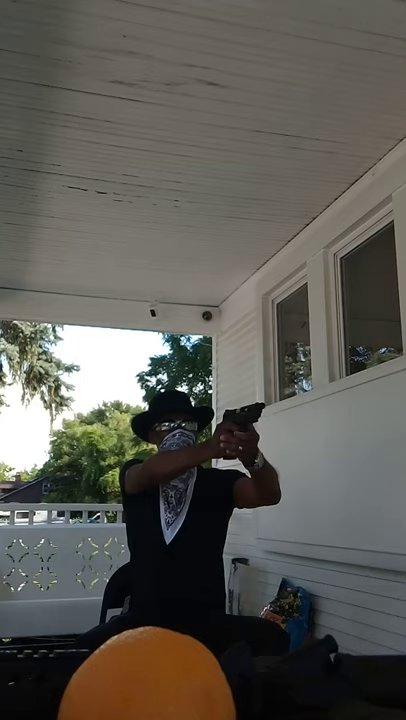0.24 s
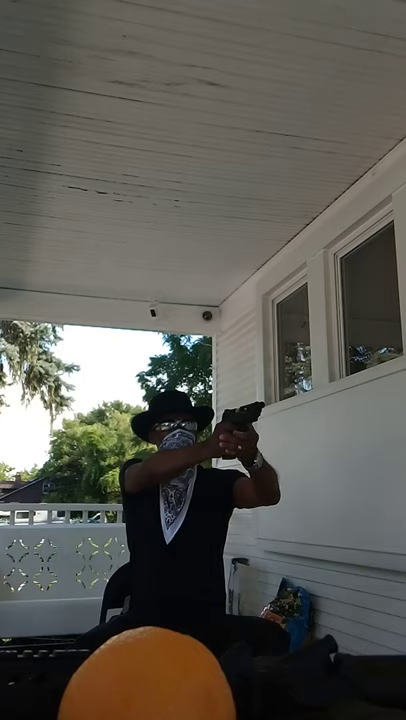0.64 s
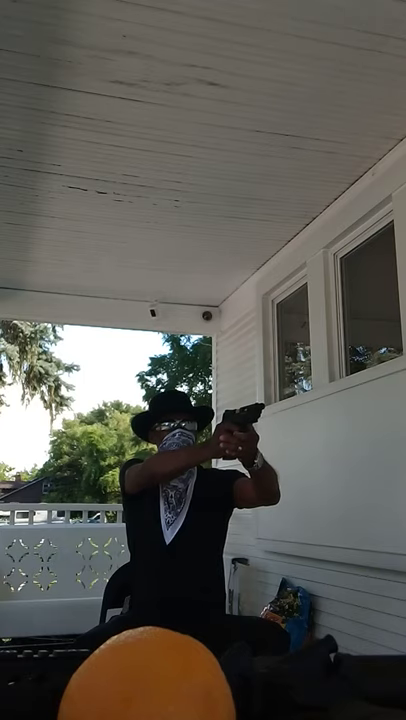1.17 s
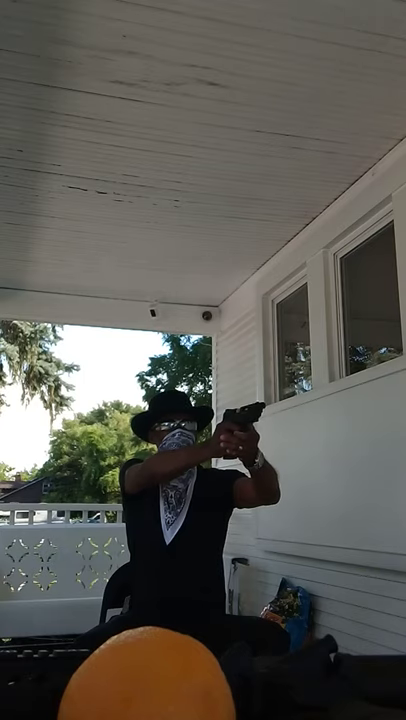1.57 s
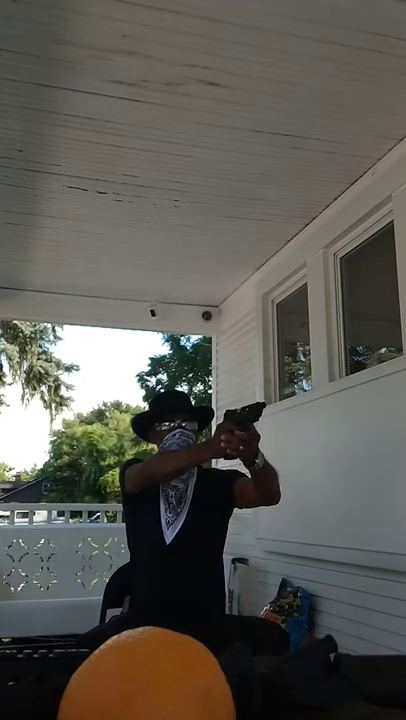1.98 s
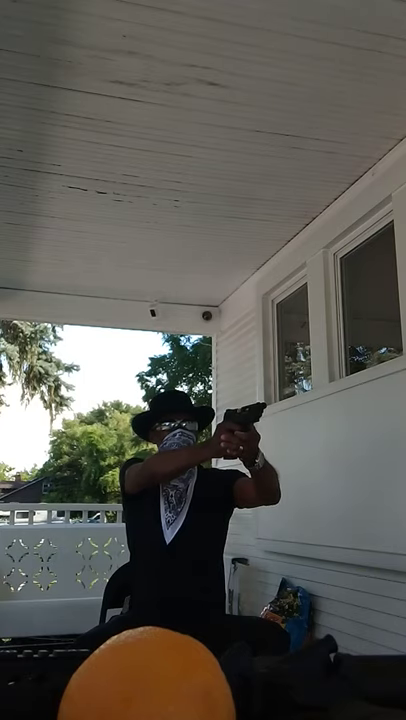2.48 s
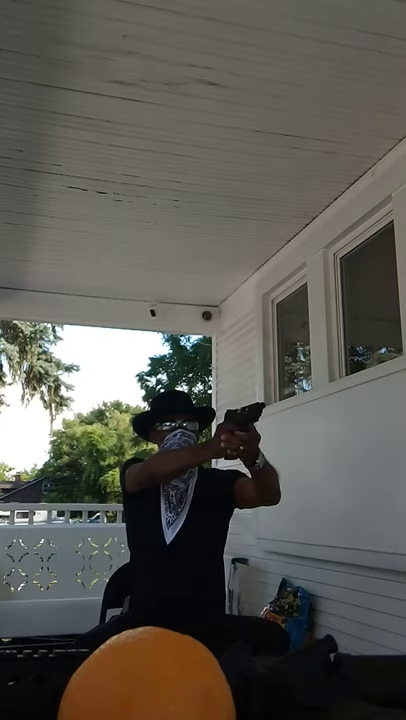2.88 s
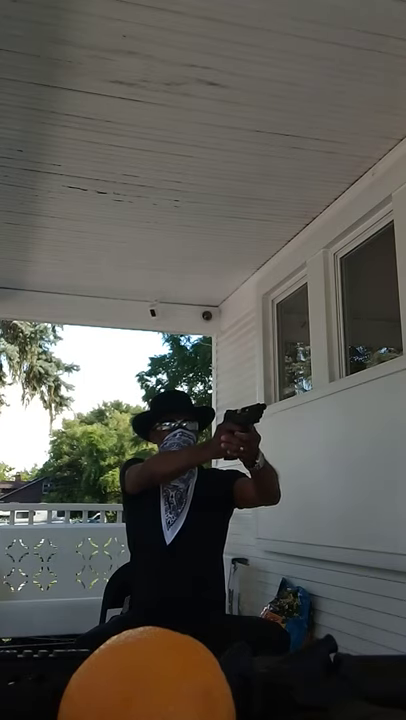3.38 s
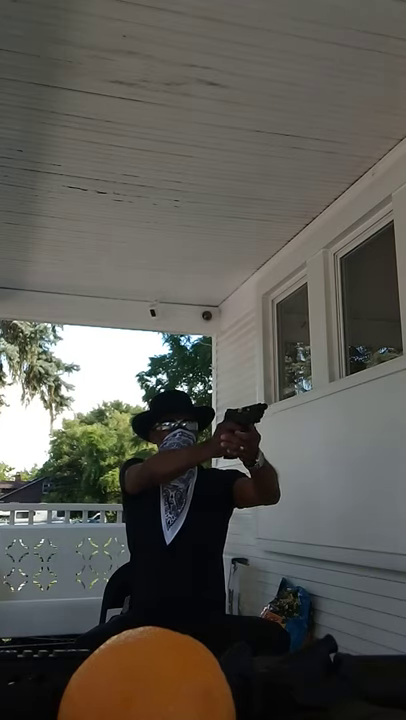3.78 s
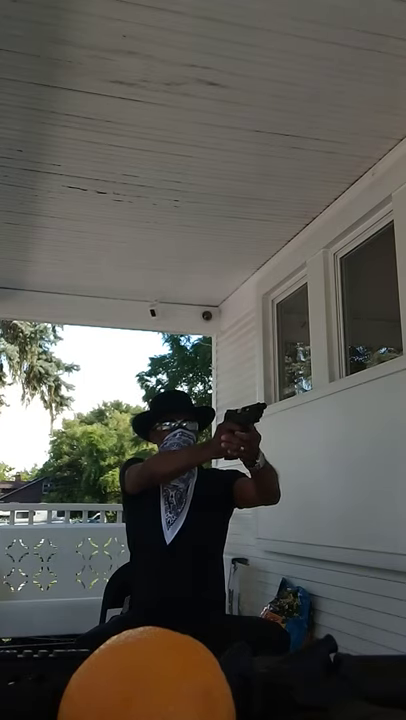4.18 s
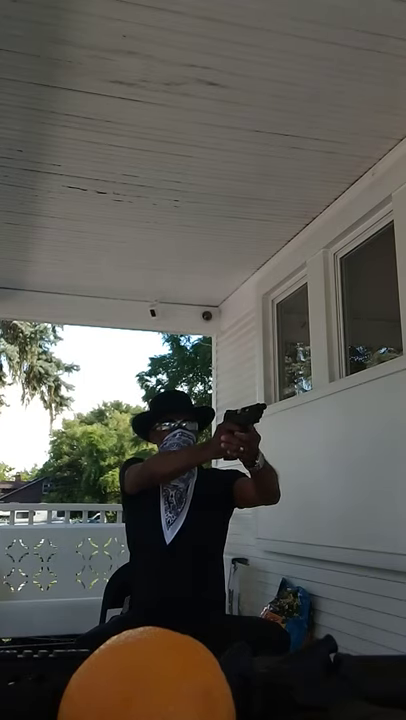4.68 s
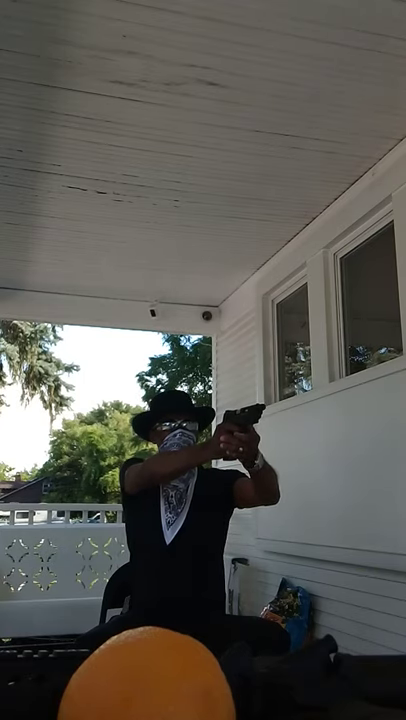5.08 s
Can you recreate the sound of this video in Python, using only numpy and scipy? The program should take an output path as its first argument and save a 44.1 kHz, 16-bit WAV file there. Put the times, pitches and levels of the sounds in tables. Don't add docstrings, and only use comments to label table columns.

```python
import sys
import numpy as np
from scipy import signal
from scipy.io import wavfile
from scipy.ndimage import uniform_filter1d, minimum_filter1d

SR = 44100
rng = np.random.default_rng(int(sys.argv[2]) if len(sys.argv) > 2 else 0)


def invert_db(level):
    return 10 ** (np.asarray(level, dtype=float) / 20)


def generate_wav(signal):
    frames = np.transpose(np.atleast_2d(signal))
    scaled = np.clip(frames, -1, 1) * 32767
    pcm = np.round(scaled).astype(np.int16)
    wavfile.write(sys.argv[1], SR, pcm)


N = 235449


def evened(x):
    return x / np.sqrt(np.mean(x ** 2) + 1e-20)


def smoothed(x, along_hz, along_time):
    return uniform_filter1d(uniform_filter1d(x, size=along_hz, axis=0), size=along_time, axis=1)


def read(points, hz):
    f, value = np.transpose(points)
    return np.interp(np.log(hz + 1), np.log(f + 1), value)


def add(mix, s, sound):
    part = mix[round(s * SR):][:len(sound)]
    part += sound[:len(part)]


def colour(points, tilt_db=0):
    hz = abs(np.fft.fftfreq(4096, 1 / SR))
    level_db = read(points, hz) + tilt_db * np.log2((hz + 200) / 2000)
    log_gain = np.log(invert_db(np.maximum(level_db, -90)))
    taps = np.fft.ifft(np.exp(np.conj(signal.hilbert(log_gain)))).real[:2048]
    return taps / np.linalg.norm(taps)


def puff(hold_s, t60, rough_db):
    t = np.arange(2000) / SR
    flicker = evened(uniform_filter1d(rng.standard_normal(len(t)), size=40))
    fall_db = 60 * np.maximum(t - hold_s, 0) / max(t60, 1e-3)
    return rng.standard_normal(len(t)) * invert_db(rough_db * flicker - fall_db)


# frequency in Hz, t60 in seconds.
PORCH_DECAY = [(100, .06), (400, 0.16), (700, 0.22), (950, 0.29), (1800, 0.26), (6000, 0.28), (12000, 0.2),
               (16000, 0.19)]
# frequency in Hz, t60 in seconds.
YARD_DECAY = [(300, 1.16), (700, 0.72), (1000, 1.234), (3000, 1.12), (7000, 0.74), (12000, 0.39)]
LATE_FALL_S, LATE_FALL_DB_PER_S = 0.57, -61


def space(tick, porch_db, yard_db, rise_s):
    hz, t, z = signal.stft(rng.standard_normal(SR), SR, nperseg=256)
    porch = invert_db(porch_db - 60 * t / read(PORCH_DECAY, hz)[:, None])
    yard = invert_db(yard_db - 60 * t / read(YARD_DECAY, hz)[:, None]) * np.clip(t / 0.081, 0, 1)
    yard = yard * invert_db(LATE_FALL_DB_PER_S * np.maximum(t - LATE_FALL_S, 0))
    patches = evened(smoothed(rng.standard_normal(z.shape), 4, 8))
    clusters = invert_db(1.65 * patches + 1.7 * rng.standard_normal(len(t)))
    echo = signal.istft(z * np.hypot(porch, yard) * clusters, SR, nperseg=256)[1]
    echo *= np.clip(np.arange(len(echo)) / SR / rise_s, 0, 1)
    return signal.fftconvolve(echo, tick)


# start in seconds, peak in dB, gas push relative to it in dB.
SHOTS = [(0.541, -6.5, -1), (1.8163, -8.5, 1), (2.5590, -8.5, -1.5), (2.7599, -9, 0.5), (3.6297, -10, 3),
         (3.8553, -9, 3), (4.7473, -10, 3)]
# frequency in Hz, density in dB per Hz.
BLAST = [(180, -21), (400, -12), (1000, -2.5), (2000, -3), (4000, -3.5), (7000, -1), (11000, -8.5),
         (16000, -17)]
# frequency in Hz, density in dB per Hz.
PUSH = [(25, -24.5), (60, -6), (120, 5.5), (250, 6), (500, -2), (1200, -3.5), (2500, -7.5), (5000, -17.5)]
FRONT_DB, FRONT_TILT_DB = 1, 3


def shots():
    mix = np.zeros(N)
    front, crack, push = colour(BLAST, FRONT_TILT_DB), colour(BLAST), colour(PUSH)
    for s, db, low_db in SHOTS:
        add(mix, s, invert_db(db + FRONT_DB) * np.convolve(puff(0.0012, 0.005, 1.0), front))
        add(mix, s, invert_db(db) * space(crack, 6.35, -19.5, 0.00117))
        gas = puff(0.014, 0.022, 2)
        add(mix, s, invert_db(db + low_db) * np.convolve(gas, push))
    return mix


# start in seconds, peak in dB, brightness in dB per octave.
STRIKES = [(0.5803, -15, 0.5), (1.8565, -17, 5), (2.6, -17, -2), (2.8038, -18.5, -3.5), (3.6727, -17, 2),
           (3.9000, -17.5, 2.5), (4.7917, -19.5, 4)]
# frequency in Hz, density in dB per Hz.
TIN = [(300, -44.5), (500, -9), (760, -31.5), (850, -6.5), (1250, -2), (1700, -2.5), (2200, -12),
       (5000, -16), (10000, -22), (16000, -48)]
# frequency in Hz, level in dB, t60 in seconds.
PANEL = [(432, -16, 0.58), (520, -8, 0.34), (544, -2.5, 0.28), (708, -18.5, 0.29), (752, -6.5, 0.31),
         (836, 3, 0.26), (938, 2.5, 0.45), (1046, -4.5, 0.28), (1122, 8.5, 0.29), (1275, 1.5, 0.37),
         (1470, -2, 0.33), (1420, -23, 0.16), (1644, 3.5, 0.24), (1703, 1.5, 0.39), (1930, -11, 0.71),
         (2080, -3.5, 0.45), (2590, 1.5, 0.3), (2900, -14, 0.35), (2900, 2, 0.4), (3580, -1, 0.28)]


def strikes():
    mix, t = np.zeros(N), np.arange(SR // 2) / SR
    hz, mode_db, t60 = np.transpose(PANEL)[:, :, None]
    modes = invert_db(mode_db - 60 * t / t60) * np.sin(2 * np.pi * hz * t) * np.clip(t / 0.0021, 0, 1)
    for s, db, tilt_db in STRIKES:
        knock = invert_db(db) * colour(TIN, tilt_db)
        add(mix, s, invert_db(3.5) * np.convolve(puff(0.0069, 0.049, 4.77), knock))
        shares = invert_db(1.9 * rng.standard_normal(len(PANEL))) * rng.choice([-1, 1], len(PANEL))
        beat_hz, turn = rng.uniform(4.47, 19.5, hz.shape), rng.random(hz.shape)
        beating = 0.59 + 1.4 * np.cos(2 * np.pi * (beat_hz * t + turn))
        add(mix, s, invert_db(db - 12.5) * shares @ (modes * beating))
        add(mix, s, space(knock, 4.5, -32.5, 0.0023))
    return mix


# frequency in Hz, density in dB per Hz.
SEAR = [(500, -54), (1000, -12.5), (1950, 2.5), (3500, -2), (5500, 4), (9500, 4), (13000, 3),
        (16000, -20.5)]
# sear letting go in seconds, peak in dB, brightness in dB per octave,
# slack taken up before that in seconds (0 = finger still on), first touch in dB.
PULLS = [(0.515, -11.5, -1.5, 0.0092, -34), (1.794, -9.5, -2.5, 0.015, -33), (2.528, -11, -3.5, 0.035, -37),
         (2.7374, -13, 1, 0, 1), (3.6085, -7, 1.5, .025, -27), (3.834, -12.5, -1, 0, 0),
         (4.7265, -7.5, 0.5, 0.037, -26)]
SLACK_S, TOUCH_TILT_DB, TOUCH_DULLS_DB_PER_S = 0.019, 1, -170
LOAD_LEAD_S, LOAD_DB, LOAD_S, LOAD_TILT_DB = 0.009, -15, 0.008, -0.8
SEAR_S = 0.0084
SNAP_DB, SNAP_S = -1, 0.002
HAMMER_LAG_S, HAMMER_DB, HAMMER_S, HAMMER_TILT_DB = 0.013, -10, 0.0097, -2.5
SLIP_T60_S = 0.03


def trigger_pulls():
    mix = np.zeros(N)
    for s, db, tilt_db, slack_s, touch_db in PULLS:
        slips = [(0, 0, SEAR_S, tilt_db),
                 (0, SNAP_DB, SNAP_S, tilt_db),
                 (HAMMER_LAG_S, HAMMER_DB, HAMMER_S, HAMMER_TILT_DB)]
        if slack_s:
            touch_tilt_db = TOUCH_TILT_DB + TOUCH_DULLS_DB_PER_S * slack_s
            slips += [(-slack_s, touch_db - db, SLACK_S, touch_tilt_db),
                      (-LOAD_LEAD_S, LOAD_DB, LOAD_S, LOAD_TILT_DB)]
        for lag_s, slip_db, length_s, slip_tilt_db in slips:
            rattle = np.convolve(puff(length_s, SLIP_T60_S, 1.6), colour(SEAR, slip_tilt_db))
            add(mix, s + lag_s, invert_db(db + slip_db - 19.5) * rattle)
    return mix


# start in seconds, peak in dB, slowness of the finger from 0 to 1.
RESETS = [(0.74, -21.5, .8), (1.9925, -23.5, 0.66), (2.884, -25.5, .1), (3.753, -25, .3),
          (3.9846, -26, 0.4), (4.11, -50.5, .1), (4.9141, -24, 1)]
# frequency in Hz, level in dB, t60 in seconds.
SPRING = [(4960, -2.5, 0.043), (6200, -3, 0.015), (8640, -8, 0.012), (9940, 8.5, 0.0079), (11900, -5, 0.01)]
LIFT_LEAD_S, LIFT_DB = 0.020, -11
STOP_LAG_S, STOP_DB = 0.020, -9


def trigger_resets():
    mix, t = np.zeros(N), np.arange(2048) / SR
    ring = sum(invert_db(db - 60 * t / t60) * np.sin(2 * np.pi * hz * t) for hz, db, t60 in SPRING)
    spring = ring / np.linalg.norm(ring) + invert_db(3.5) * colour(SEAR)
    for s, db, slow in RESETS:
        slow = np.clip(slow, 0, 1)
        ticks = [(0, 1), (-LIFT_LEAD_S, slow * invert_db(LIFT_DB)), (STOP_LAG_S, slow * invert_db(STOP_DB))]
        for lag_s, gain in ticks:
            tick = np.convolve(puff(0.0083, 0.034, 1.2), spring)
            add(mix, s + lag_s, gain * invert_db(db - 8.5) * tick)
        add(mix, s, invert_db(db) * space(spring, -15, -58, 0.0025))
    return mix


# start in seconds, peak in dB, how hidden from the microphone from 0 to 1,
# brightness in dB per octave.
BOUNCES = [(0.0811, -34, .8, 1.5), (0.2211, -44.5, .9, -1.5), (0.358, -45.5, .85, -3.5),
           (3.0807, -25, .02, 1), (3.19, -33, .6, -2.5), (3.51, -43.5, .9, -6.5), (4.375, -30.5, 0.1, -3),
           (4.4742, -28, .2, -4), (4.607, -50, .95, -2)]
# frequency in Hz, density in dB per Hz.
FLOORBOARD = [(250, -31), (500, -18), (900, -7), (1350, -4.5), (1600, 5.5), (1950, -3.5), (3100, 0),
              (4000, -1), (7000, -0.5), (11000, -11.5), (16000, -27.5)]
# delay in seconds, level in dB.
WALLS = [(.0025, 0.5), (0.01, 0), (0.02, 0), (0.03, -8.5), (.0375, -5)]
OPEN_DB, HIDDEN_DB = 7, -8
DULLED_DB = -5
CEILING_NEAR_S, CEILING_FAR_S = 0.007, 0.0105
CEILING_NEAR_DB, CEILING_FAR_DB = -14, 8
TREBLE_HZ, TREBLE_SHARE = 9000, 2.5


def bounces():
    mix = np.zeros(N)
    for s, db, hidden, tilt_db in BOUNCES:
        direct_db = OPEN_DB + (HIDDEN_DB - OPEN_DB) * hidden
        ceiling_s = CEILING_NEAR_S + (CEILING_FAR_S - CEILING_NEAR_S) * hidden
        ceiling_db = CEILING_NEAR_DB + (CEILING_FAR_DB - CEILING_NEAR_DB) * hidden
        landing = [(hz, level_db + TREBLE_SHARE * tilt_db * (hz > TREBLE_HZ)) for hz, level_db in FLOORBOARD]
        board = invert_db(db) * colour(landing, tilt_db)
        direct = np.convolve(puff(0.00038, 0.0028, 0), colour(landing, tilt_db + DULLED_DB * hidden))
        add(mix, s, invert_db(db + direct_db - 2.5) * direct)
        ceiling = np.convolve(puff(0.00059, 0.023, 0), colour(landing, tilt_db - 0.5))
        add(mix, s + ceiling_s, invert_db(db + ceiling_db) * ceiling)
        for delay_s, wall_db in WALLS:
            wall = np.convolve(puff(0.0009, 0.018, 0), board)
            add(mix, s + delay_s, invert_db(0.57 * direct_db + wall_db - 3) * wall)
        add(mix, s, space(board, -3.0, -49, 0.0047))
    return mix


def wash(points, patchy_db, flicker_db):
    frames, hz = N // 128 + 5, np.fft.rfftfreq(512, 1 / SR)
    a, b, patches = rng.standard_normal((frames, 257, 3)).T
    patches = evened(smoothed(patches, 5, 20))
    flicker = evened(uniform_filter1d(rng.standard_normal(frames), size=3))
    z = (a + 1j * b) * invert_db(read(points, hz)[:, None] + patchy_db * patches + flicker_db * flicker)
    return evened(signal.istft(z, nperseg=512, noverlap=384)[1][:N])


# frequency in Hz, density in dB per Hz.
INSECTS = [(3900, -48), (4100, -45.5), (4300, -18.5), (4700, -14.5), (5700, -15.5), (6500, -12), (7000, -5),
           (7700, -9), (8500, -9.5), (9000, -16.5), (9700, -33.5), (11000, -44.5), (13000, -78)]
# time in seconds, level in dB.
CHORUS = [(0, -53), (.45, -52.5), (1.3, -54), (3.4, -58.5), (5.34, -56)]
# note in Hz, rms level in dB.
SINGERS = [(6372, -71), (6710, -75), (6934, -85), (7139, -82.5), (7300, -86.5)]


def insects():
    t = np.arange(N) / SR
    chorus = invert_db(np.interp(t, *np.transpose(CHORUS))) * wash(INSECTS, 0.74, 0.6)
    for hz, db in SINGERS:
        waver = rng.standard_normal((2, N))
        waver = evened(uniform_filter1d(uniform_filter1d(waver, size=900), size=900))
        note = waver[0] * np.sin(2 * np.pi * hz * t) + waver[1] * np.cos(2 * np.pi * hz * t)
        chorus += invert_db(db) * note
    return chorus


# frequency in Hz, density in dB per Hz.
STREET = [(15, -69), (25, -27.5), (107, -10), (160, -10), (216, -14), (291, -21.5), (418, -16), (517, -11),
          (921, -7.5), (1000, -10), (1300, -13.5), (1980, -24.5), (4100, -59), (5330, -75), (9020, -120)]


def street():
    nearly_flat = [(20, 0), (20000, 0.018)]
    murmur = signal.oaconvolve(wash(nearly_flat, 0.88, 0.4), colour(STREET))[:N]
    return invert_db(-59.5) * evened(murmur)


# centre in seconds, level in dB.
GUSTS = [(.15, -58), (.45, -66), (1.15, -71), (1.55, -66.5), (1.76, -60), (2.1, -63), (2.35, -63),
         (3.05, -64), (3.45, -64), (4.15, -62.5), (4.6, -62), (5.02, -67), (5.21, -60.5)]
# frequency in Hz, density in dB per Hz.
WIND = [(30, -18), (70, -8), (130, 4.5), (250, -7.5), (450, -31), (900, -72)]
GUST_S, LUMP_DB, LUMP_S = 0.11, 2.5, 0.022


def wind():
    t = np.arange(N) / SR
    gusts = sum(invert_db(db) * np.exp(-0.5 * ((t - s) / GUST_S) ** 2) for s, db in GUSTS)
    lumps = invert_db(LUMP_DB * evened(uniform_filter1d(rng.standard_normal(N), round(LUMP_S * SR))))
    rumble = signal.oaconvolve(lumps * rng.standard_normal(N), colour(WIND))[:N]
    return gusts * evened(rumble)


def scene():
    pistol = shots() + strikes() + trigger_pulls() + trigger_resets() + bounces()
    return (pistol + insects() + street() + wind())[None]


def band_limit(x):
    return signal.sosfilt(signal.butter(12, 16970, fs=SR, output="sos"), x)


# frequency in Hz, response in dB.
MICROPHONE = [(4500, 0), (5700, 4), (6500, 7), (7500, 1), (9000, -1), (12000, -3.5), (13700, -10.5),
              (14700, 12), (15600, 6.5), (16100, -25), (16500, -33), (17500, -51)]
# frequency in Hz, density in dB per Hz.
HISS = [(2000, 0), (8000, -6), (14000, -12), (15300, -4), (16000, -6), (16600, -50)]
SELF_NOISE_DB, EDGE_HZ = -82, 16500
LIMIT_DB, AHEAD_S, HOLD_S, GLIDE_S = -12.5, 0.01, 0.085, 0.032


def record(dry):
    heard = signal.oaconvolve(dry[0], colour(MICROPHONE))[:N]
    heard = heard + invert_db(SELF_NOISE_DB) * signal.oaconvolve(rng.standard_normal(N), colour(HISS))[:N]
    ahead, hold = round(AHEAD_S * SR), round(HOLD_S * SR)
    power_db = 10 * np.log10(abs(uniform_filter1d(heard ** 2, size=300)) + 1e-12)
    cut_db = np.minimum(LIMIT_DB - power_db, 0)
    span = ahead + hold + 1
    held_db = minimum_filter1d(np.pad(cut_db, (hold, ahead)), span)[span // 2:][:N]
    limited = heard * invert_db(uniform_filter1d(held_db, round(GLIDE_S * SR)))
    clipped = 0.65 * np.tanh(limited / 0.73)
    banded = signal.oaconvolve(clipped, signal.firwin(101, EDGE_HZ, fs=SR), "same")
    return band_limit(banded[None])


dry = scene()
out = record(dry)
generate_wav(out)
```